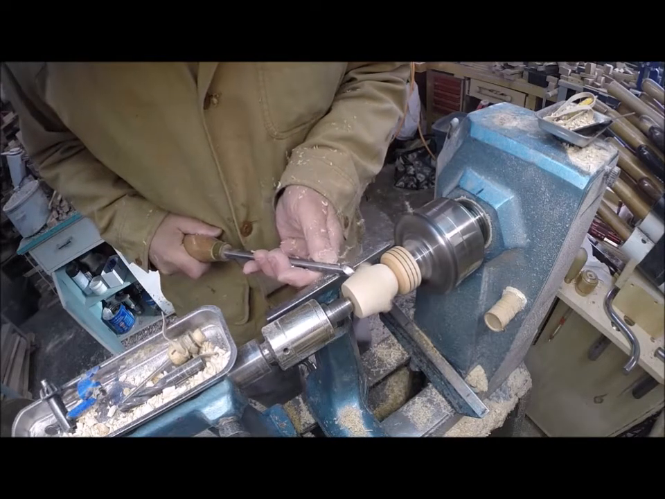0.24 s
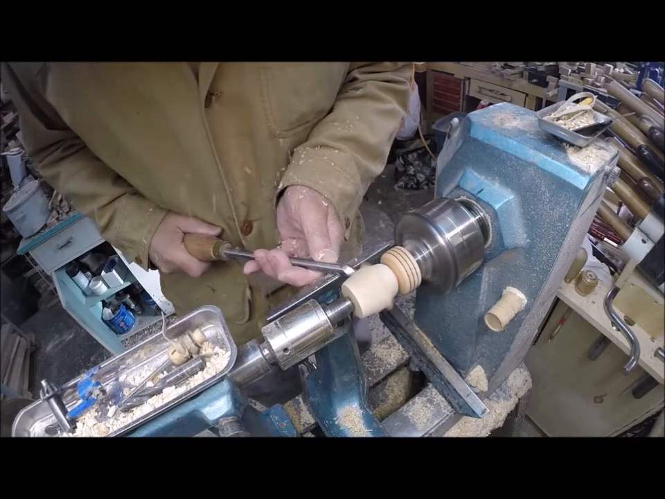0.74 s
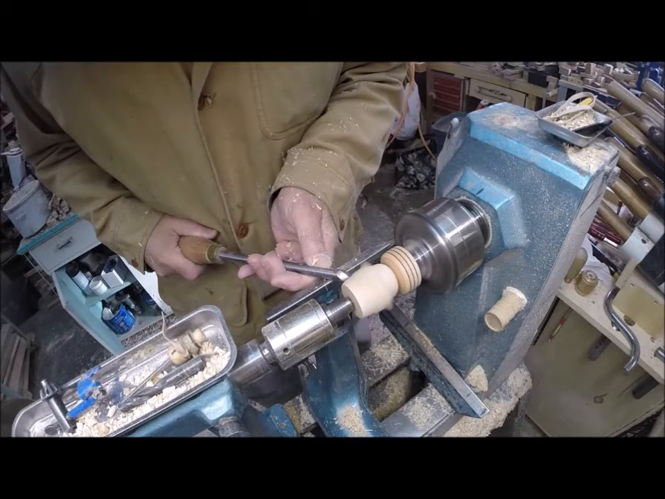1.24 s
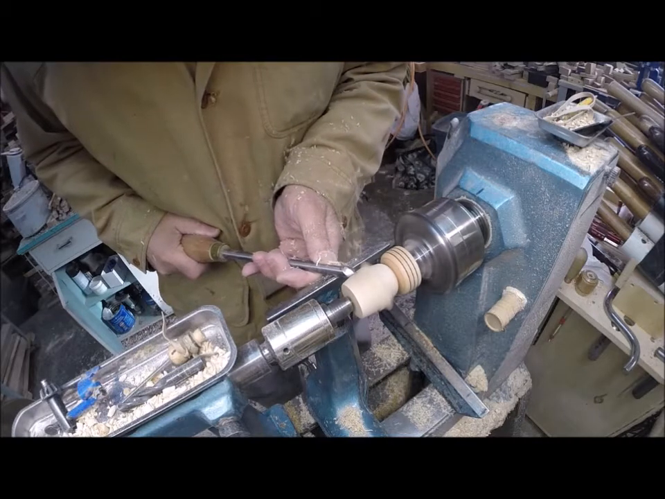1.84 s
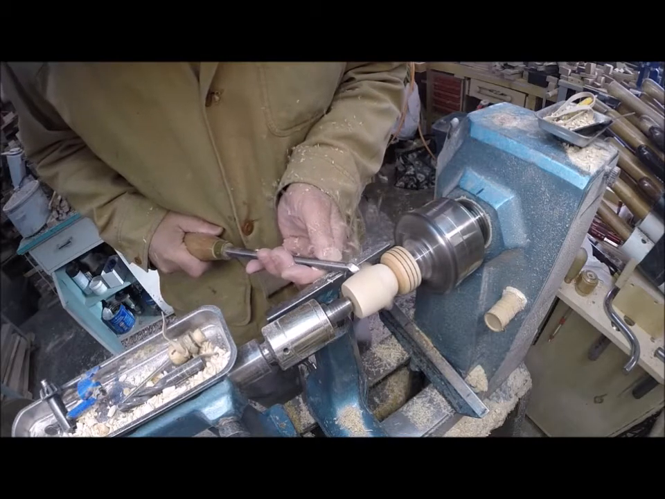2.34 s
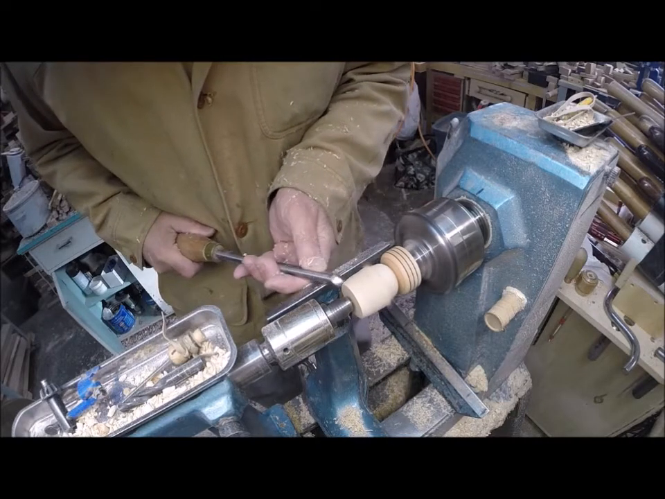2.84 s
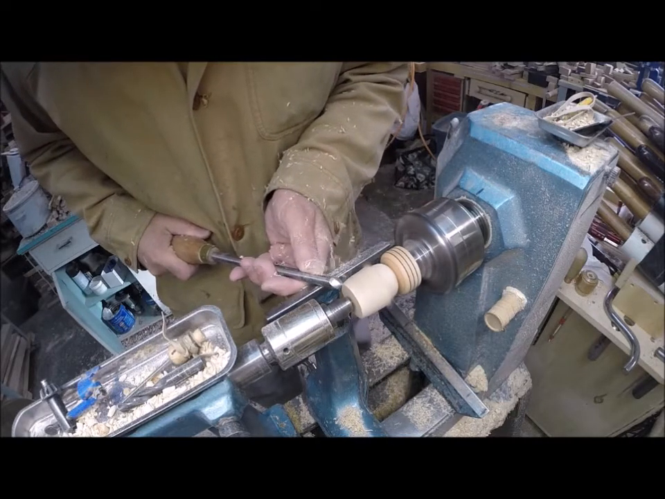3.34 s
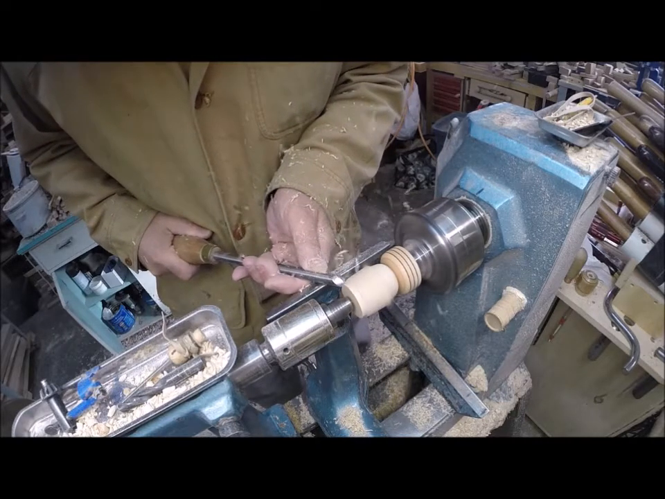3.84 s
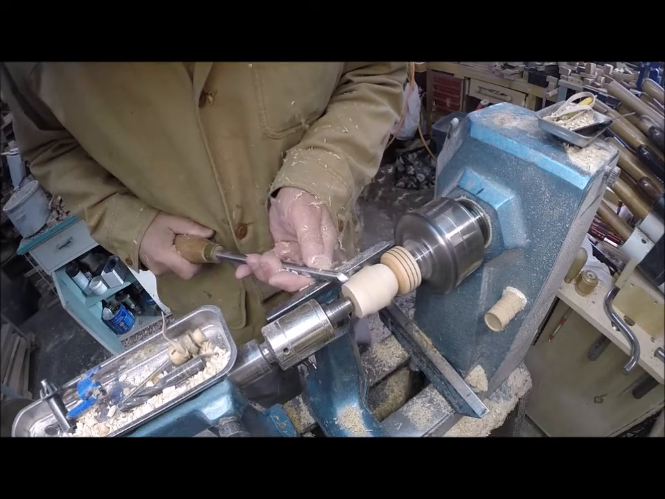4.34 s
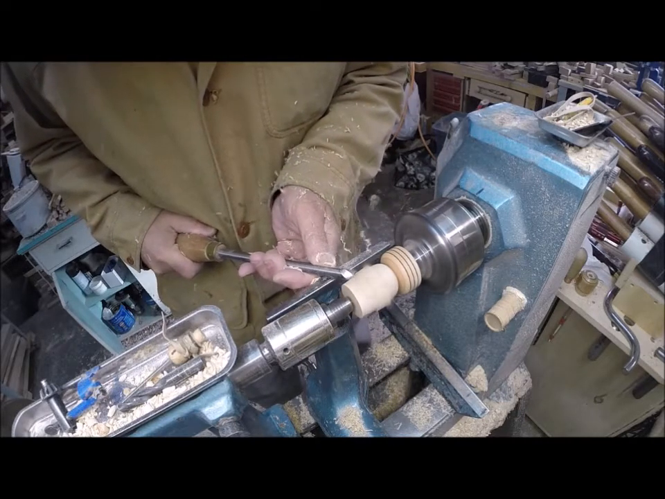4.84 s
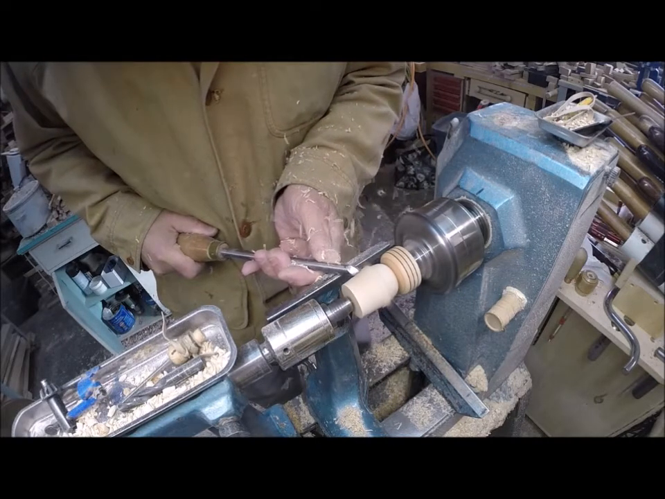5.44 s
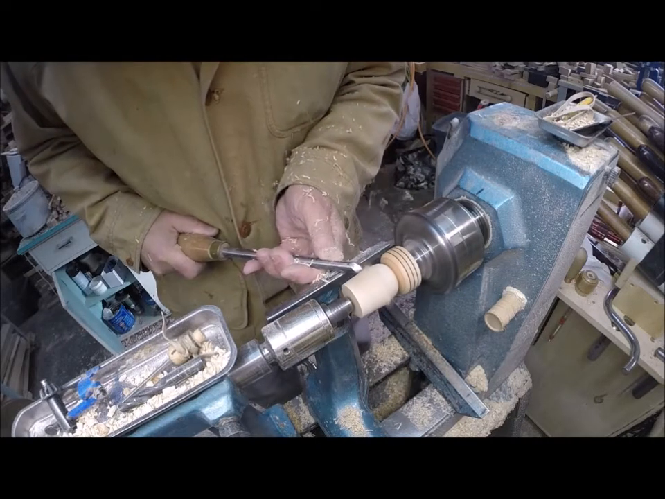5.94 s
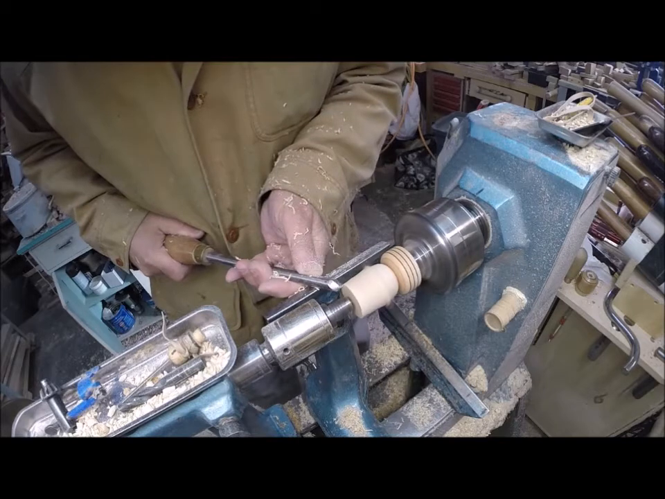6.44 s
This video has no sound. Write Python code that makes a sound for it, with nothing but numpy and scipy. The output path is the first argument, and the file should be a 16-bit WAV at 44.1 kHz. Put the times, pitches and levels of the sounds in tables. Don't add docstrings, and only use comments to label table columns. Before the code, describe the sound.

Heard close, a wood lathe runs at constant speed: low motor hum, soft belt and bearing rush, and a deep drone near 157 Hz that swells shortly after the tool presses. From 0 to 0.75 s a gouge is already cutting, a coarse rasping hiss fluttering at about 40 turns a second, with hard metallic ringing, strongest near 0.5 s. It lifts; a light scratch comes at 0.8-0.9 s. From about 1.1 s a second pass grows gradually, uneven and clattery with small catches, firmest at 2.5 s, with sharp snags around 2.6 s before stopping at 2.7 s. Brief touches at 2.85 and 3.12 s. The third pass enters at 3.3 s and holds a loud, bright, gritty scrape from 4 to nearly 6 s, with a snag near 5.07 s. It clears by 6.1 s, leaving hum and faint touches near 6.3 and 6.55 s. Short dry room; brief lossy dull patches.

```python
import sys
import numpy as np
from scipy import signal
from scipy.fft import rfft, irfft
from scipy.io import wavfile
from scipy.ndimage import uniform_filter1d

SR = 44100
rng = np.random.default_rng(int(sys.argv[2]) if len(sys.argv) > 2 else 0)


def transcribe(signal):
    frames = np.atleast_2d(signal).T
    limited = np.clip(frames, -1, 1)
    pcm = np.round(limited * 32767).astype(np.int16)
    wavfile.write(sys.argv[1], SR, pcm)


def rack_gain(trim_db):
    fader = np.asarray(trim_db, float)
    return 10 ** (fader / 20)


N = 294588
T = np.arange(N) / SR
SPINDLE_HZ = 39.22

# [t/s, edge pressure/dB, bed load re pressure/dB, grain unevenness/dB]
PASS_ONE = [
    (0.0, -39, -5, 1),
    (0.17, -38, -0.5, 10),
    (0.48, -27, -4.5, 10),
    (0.59, -30, -7, 0),
    (0.7, -35.5, -2.5, 6.5),
    (0.72, -47, 2, -1),
    (0.76, -48, -5, 13),
]
PASS_TWO = [
    (1.02, -53, -7, 4.3),
    (1.13, -45, -11, 4.1),
    (1.34, -42, 0, 2.9),
    (1.49, -35, -2, 5.5),
    (1.93, -31.5, -3.5, 11.5),
    (2.32, -32, -2.5, 10),
    (2.51, -28, -6, 2.7),
    (2.63, -33, -2.5, 5.5),
    (2.73, -54.5, 2.5, 2.8),
]
PASS_THREE = [
    (3.27, -48.5, -4, 2.9),
    (3.33, -39, -5.5, 4.6),
    (3.52, -34, -7, 4.8),
    (3.85, -32.5, -8, 5.6),
    (4.02, -28, -9.5, 12),
    (4.3, -28.5, -5.5, 4.7),
    (5.02, -28, -8, 8.9),
    (5.93, -32.5, -3.5, 5.4),
    (6.08, -53, 7, 4.6),
]
HOVERS = [
    (3.08, -56.5, 4, -1),
    (6.2, -54, -8, -4.5),
]
# [t/s, hold/s, edge pressure/dB, fading/(dB/s)]
TOUCHES = [
    (0.798, 0.1, -40.5, 145),
    (2.842, 0.097, -43, 247),
    (3.123, .005, -43, 33),
    (6.255, .02, -44.5, 300),
    (6.55, .005, -41, 33),
]
TOUCH_RISE_S = 0.025
# [t/s, loss/dB]
DIPS = [
    (0.63, -6.5),
    (2.06, -4.5),
    (2.551, -7.5),
]
DIP_S = 0.044
# [t/s, peak level/dB]
CATCHES = [(0.4344, -20), (0.4634, -16), (0.488, -16), (0.662, -17), (0.6924, -20.5), (0.822, -30),
           (1.7563, -34.5), (1.8083, -28), (1.832, -18.5), (2.089, -19), (2.167, -22), (2.24, -23),
           (2.3451, -34), (2.396, -22), (2.4715, -20), (2.497, -20), (2.597, -14), (2.6259, -10.5),
           (2.849, -26), (3.1207, -21.5), (4.5371, -28), (4.562, -22), (5.0225, -28), (5.0735, -14),
           (5.708, -20), (5.9394, -32), (6.3839, -29), (6.409, -26.5), (6.5396, -26), (6.562, -32)]
# [t/s, hard bite angle/turns, soft bite lag/turns, soft bite share/0-1]
GRAIN = [(0, -.03, .45, .5), (.35, .06, .33, .4), (.7, .07, .5, .4), (1.1, -.09, .48, .6),
         (1.6, -.04, .44, .35), (2.0, -.02, .5, .2), (2.7, .01, .38, .35), (3.3, -.05, .46, .65),
         (4.4, -.03, .48, .5), (6.68, -.03, .47, .45)]
GRIPS = [
    (0, 0),
    (.76, 4),
    (1.08, 1),
    (2.78, 4),
    (3.05, 2),
    (5.15, 3),
    (6.2, 4),
    (6.33, 0),
    (6.5, 3),
]
MODE_HZ = [1110, 1370, 1610, 1935, 2588, 2930, 3330, 3740, 3950, 4284, 4435, 4550, 4700, 4840, 5325, 5570,
           5735, 5965, 6430, 7080, 7810, 8970, 9530, 10400, 10850, 13700]
MODE_WIDTH_HZ = [60, 180, 80, 100, 33, 120, 150, 95, 85, 48, 70, 80, 120, 75, 80, 70, 95, 95, 170, 190, 190,
                 170, 160, 180, 220, 600]
MODES_DB = [(-13, -13, -20, -34, -24), (-11.5, -10.5, -14.5, -12, -14.5), (-35, -14.5, -49, -44, -26),
            (-5.5, -4.5, -10.5, -0.5, -13), (9, 11.5, 7.5, 8, 6), (-4, -3, -3, -4, 6),
            (-3.5, -2, -5, -6, 7.5), (-4.5, -1.5, -6, -26, 6), (-1.5, -9.5, -5, -15, 2),
            (-22, -2.5, 3.5, -15, -30), (-20, -3.5, -3.5, 1.5, -10), (-1, 3.5, 7.5, 6, -10),
            (-15, -3, -8, -1, -1.5), (-8, -40, -6, -27, -38),
            (-6.5, -2, -4.5, -2, -11), (-22, -11, -23, -12, -18), (-19, -1.5, 4, 5.5, -49),
                 (-1.5, 5.5, 0.5, 2, -27), (-4, -3.5, -15, -9, -22), (-4, -8.5, -8, -11, -5),
                 (-34, -20, -15, -7.5, -9), (-2, -15, -15.5, -13.5, -21), (-30, -39, -48, -19, -28),
                 (-42, -45, -41, -23, -45), (-34, -25.5, -24, -24, -26), (-24, -28, -27, -26, -29)]
# [f/Hz, density/(dB/Hz)]
SHAVING = [(240, -57), (400, -29.5), (831, -27.5), (1700, -13), (1890, -3.5), (2140, -13.5), (2530, -11.5),
           (3380, -8.5), (4450, -10.5), (5100, -12), (5940, -10), (8430, -56), (9240, -10.5), (13700, -37),
           (15300, -65)]
# [level/dB in rasp, singing, scrape, fizz]
TEARING_DB = [3, -5, -1, 0]
FIZZ_DB = [-13, -17.5, -19, -18.5, -28]
RASP_DB = [-10, -11.5, -14.5, -10, -9.5]
SING_DB = [-6, -6, -8.5, -6.5, -7]
FIZZ_GIVE, RASP_GIVE, SING_GIVE, OCTAVE_GIVE = 0.32, 0.15, 0.13, 0.14
FIRM_DB, MAX_EASED_DB = -30, 15.5
OCTAVE_DB = [-12, -14.5, -17.5, -19, -12.5]
SHAKE_DB = [6, 0, -3.5, -4, 7]
# [spindle multiple, level re drone/dB]
SHAKE = [(5, -26), (6, -27.5), (7, -35), (9, -22.5), (10, -30.5), (13, -35), (17, -34.5), (21, -37)]
BED_LAG_S, BED_SMOOTH_S = 0.069, 0.036
BED_IDLE_DB, OCTAVE_IDLE_DB = -59, -61.5
# [f/Hz, level/dB]
HUM = [(39.22, -54.5), (78.44, -68), (117.3, -55.5), (156.88, -76), (313.76, -57)]
# [f/Hz, density/(dB/Hz)]
IDLE = [(35, -45), (60, 18), (334, -8.5), (430, -1), (638, -15), (863, -4), (1010, -1), (1170, -6),
        (2130, -7.5), (2950, 6.5), (3890, -19), (6050, -5), (7980, -22), (9610, -14.5), (15300, -26)]
IDLE_DB = -46.5
# [f/Hz, gain/dB]
MIC = [(8, -10), (18, 0), (8200, 0), (8430, -8), (8700, 0), (11900, 0), (12400, 3), (13900, 0), (14300, -5),
       (15250, -3), (15500, -22)]
FRAME_S = 1024 / 48000
BADLY_THINNED = [28, 30, 48, 51, 58, 78, 80, 92, 97, 120, 129, 137, 174, 183, 205, 215, 256, 265, 276, 286, 287,
                 289, 293, 304]
SLIGHTLY_THINNED = [2, 17, 33, 37, 73, 86, 99, 127]
# [gain/dB when badly, slightly thinned]
LEAK_DB = [-17, -7]


def gouge():
    level_db, held = contact()[0], grip()
    rasp_db = colour(RASP_DB, RASP_GIVE, level_db)
    sing_db = colour(SING_DB, SING_GIVE, level_db) - 0.5
    fizz_db = colour(FIZZ_DB, FIZZ_GIVE, level_db)
    pressure = bites()
    soft = pressure ** .4 * rack_gain(.6 * level_db)
    layers = [  # drive, low/Hz, high/Hz, level/dB, repeating share, tearing/dB
        (soft, 450, 2200, rasp_db, .55, TEARING_DB[0]),
        (soft, 2200, 2800, sing_db, .12, TEARING_DB[1]),
        (pressure, 2800, 8400, 0, .15, TEARING_DB[2]),
        (pressure, 8400, 17000, fizz_db, .1, TEARING_DB[3])]
    hz, width = np.array(MODE_HZ), np.array(MODE_WIDTH_HZ)
    gain = rack_gain(np.array(MODES_DB))
    sound = np.zeros(N)
    for drive, lo, hi, db, repeat, tearing_db in layers:
        force = drive * chips(0.94, repeat)
        inside = np.flatnonzero((hz > lo) & (hz < hi))
        total = np.sqrt(np.pi * width[inside] / SR @ gain[inside] ** 2)
        modes = np.zeros(N)
        for k in inside:
            feed = (gain[k] / total)[held] * rack_gain(2.1 * wander(60) + 2.5 * wander(4.05))
            modes += ring(feed * force, hz[k], width[k])
        band = signal.butter(3, [lo, hi], "band", fs=SR, output="sos")
        tearing = evened(signal.sosfilt(band, coloured(force, SHAVING)))
        tearing *= np.sqrt(np.mean(force ** 2))
        sound += rack_gain(db - 5.0) * signal.sosfilt(band, modes + rack_gain(tearing_db) * tearing)
    return sound


def contact():
    pass_db, load_db, depth_db = curves(sorted(PASS_ONE + PASS_TWO + PASS_THREE + HOVERS))
    level_db = pass_db.copy()
    for s, db in DIPS:
        level_db += db * np.clip(1 - abs(T - s) / DIP_S, 0, 1)
    for s, hold_s, db, fading in TOUCHES:
        rise_db = 20 * np.minimum(T - s, 0) / TOUCH_RISE_S
        fade_db = fading * np.maximum(T - s - hold_s, 0)
        level_db = np.maximum(level_db, db + rise_db - fade_db)
    return level_db, pass_db + load_db, depth_db


def bites():
    angle, lag, share = curves(GRAIN)
    level_db, _, depth_db = contact()
    turns = SPINDLE_HZ * T - angle + 1.071
    strength = rack_gain(0.85 * rng.standard_normal((int(SPINDLE_HZ * N / SR) + 3, 2)))
    pressure = rack_gain(-np.clip(depth_db, -10, 20))
    hard_and_soft = [(turns, 1), (turns - lag, np.clip(1.3 * share, 0, 1))]
    for k, (at, size) in enumerate(hard_and_soft):
        u = at % 1 / 0.076
        pressure += size * u * np.exp(1 - u) * strength[at.astype(int), k]
    pressure *= rack_gain(level_db) / np.sqrt(uniform_filter1d(pressure ** 2, 2250))
    u = np.arange(900) / SR / .0016
    for s, db in CATCHES:
        pressure[int(s * SR):][:900] += rack_gain(db - 12) * u * np.exp(1 - u)
    return pressure


def chips(spread_db, repeat):
    turn = round(SR / SPINDLE_HZ)
    fresh = rng.standard_normal((N // turn + 1, turn))
    ridges = signal.lfilter([1], [1, -.88], fresh, axis=0).ravel()[:N]
    tear = np.sqrt(repeat) * evened(ridges) + np.sqrt(1 - repeat) * rng.standard_normal(N)
    click_db = spread_db * np.minimum(rng.exponential(1, N), 4)
    return evened(tear * rack_gain(click_db + 1.3 * wander(300)))


def grip():
    start, number = np.transpose(GRIPS)
    return number.astype(int)[np.searchsorted(start, T, "right") - 1]


def colour(firm_db, give, level_db):
    eased_db = np.minimum(FIRM_DB - level_db, MAX_EASED_DB)
    return uniform_filter1d(np.array(firm_db, float)[grip()], size=4000) + give * eased_db


def spindle_tone(multiple, wobble_db):
    phase = 2 * np.pi * (multiple * SPINDLE_HZ * T + rng.random())
    return rack_gain(wobble_db * wander(9)) * np.sin(phase)


def bed():
    level_db, load_db, _ = contact()
    late = rack_gain(np.interp(T - BED_LAG_S, T, load_db))
    late = uniform_filter1d(late, int(BED_SMOOTH_S * SR))
    drone = np.hypot(late, rack_gain(BED_IDLE_DB))
    octave_db = level_db + colour(OCTAVE_DB, OCTAVE_GIVE, level_db)
    octave = np.hypot(rack_gain(octave_db), rack_gain(OCTAVE_IDLE_DB))
    box = resonance(303.6, 36, 303.6, 36)
    mutter = resonance(155, 15, 156.7, 13.5)
    shake = sum(rack_gain(db) * spindle_tone(k, 1.7) for k, db in SHAKE)
    sound = late * spindle_tone(4, 1.0) + octave * (0.55 * spindle_tone(8, 0.7) + 0.36 * box)
    sound += drone * rack_gain(colour(SHAKE_DB, 0, level_db)) * shake
    sound += rack_gain(BED_IDLE_DB + 1.5) * mutter
    return np.sqrt(2) * sound


def motor():
    tones = np.zeros(N)
    for hz, db in HUM:
        tones += rack_gain(db + 1.5 * wander(7)) * np.sin(2 * np.pi * (hz * T + rng.random()))
    rumble = rack_gain(-55 + 2.0 * wander(6.7)) * evened(ring(rng.standard_normal(N), 71, 72))
    stand = rack_gain(-60) * resonance(327, 29, 327, 29)
    rush = evened(coloured(rng.standard_normal(N), IDLE)) * rack_gain(IDLE_DB - 6.5 + 1.2 * wander(12))
    return np.sqrt(2) * tones + rumble + stand + rush


def shop(x):
    t = np.arange(9000) / SR
    sparse = rng.choice([-1., 1.], 9000) * (rng.random(9000) < .05)
    taps = sparse * rack_gain(-60 * t / .25) * (t > .004)
    return signal.fftconvolve(x, taps / np.linalg.norm(taps))[:N]


def evened(x):
    return x / np.sqrt(np.mean(x ** 2) + 1e-20)


def curves(rows):
    s, *columns = np.transpose(rows)
    return [np.interp(T, s, c) for c in columns]


def coloured(x, points):
    f, db = np.transpose(points)
    hz = np.fft.rfftfreq(len(x), 1 / SR)
    gain_db = np.interp(np.log(hz + 1), np.log(f + 1), db)
    return irfft(rfft(x) * rack_gain(gain_db), len(x))


def wander(hz):
    steps = int(N / SR * hz) + 2
    return np.interp(T * hz, np.arange(steps), rng.standard_normal(steps)) * np.sqrt(1.5)


def ring(x, hz, width_hz):
    return signal.lfilter(*signal.iirpeak(hz, hz / max(width_hz, 5), SR), x)


def resonance(hz_1, width_1_hz, hz_2, width_2_hz):
    return evened(ring(ring(rng.standard_normal(N), hz_1, width_1_hz), hz_2, width_2_hz))


def scene():
    tool = gouge()
    return (tool + rack_gain(-13) * shop(tool) + bed() + motor())[None]


def band_limit(x):
    return signal.sosfilt(signal.butter(12, 15430, fs=SR, output="sos"), x)


def record(dry):
    heard = coloured(dry[0], MIC)
    size = 2 * int(FRAME_S * SR)
    window, hz = np.hanning(size) ** .8, np.fft.rfftfreq(size, 1 / SR)
    leaks_db = np.repeat(LEAK_DB, [len(BADLY_THINNED), len(SLIGHTLY_THINNED)])
    mix = heard.copy()
    for frame, leak_db in zip(BADLY_THINNED + SLIGHTLY_THINNED, leaks_db):
        at = int((frame + .69) * FRAME_S * SR) - size // 2
        lines = rfft(heard[at:at + size] * window) * (hz > 420)
        strong = abs(lines) > np.percentile(abs(lines), 97.5)
        kept = np.where(strong, rack_gain(3.5), rack_gain(leak_db))
        mix[at:at + size] += irfft(lines * (kept - 1), size) * window
    return band_limit(mix[None])


dry = scene()
out = record(dry)
transcribe(out)
```